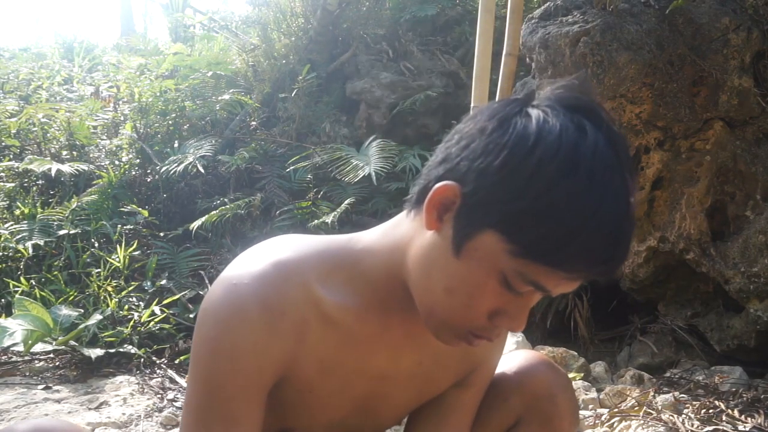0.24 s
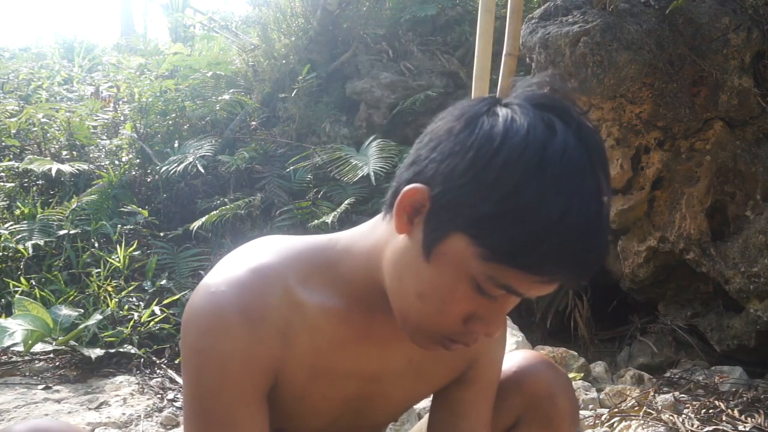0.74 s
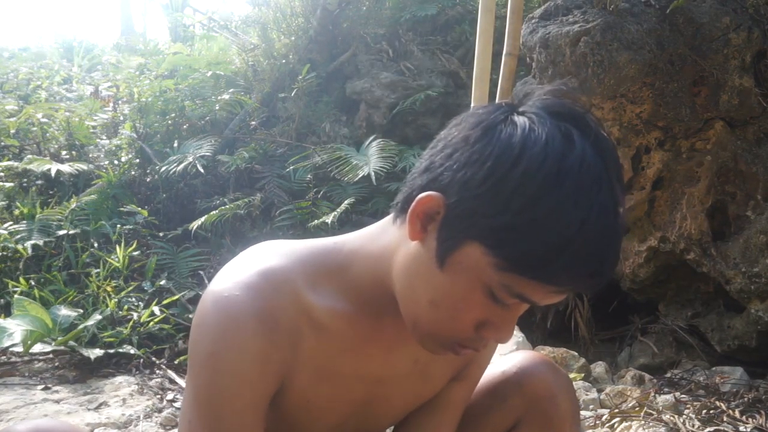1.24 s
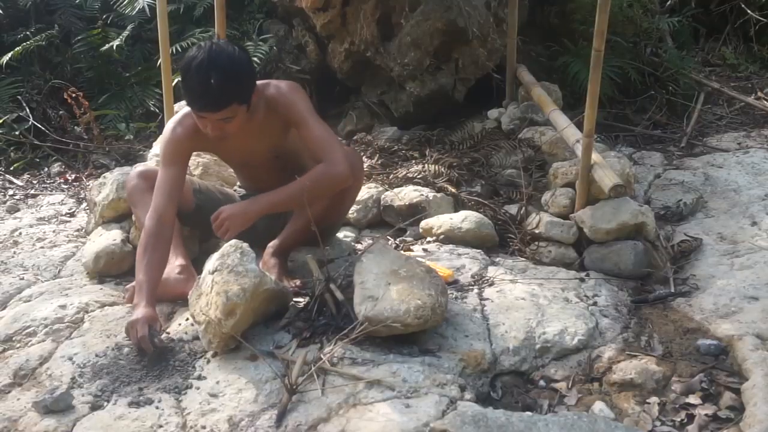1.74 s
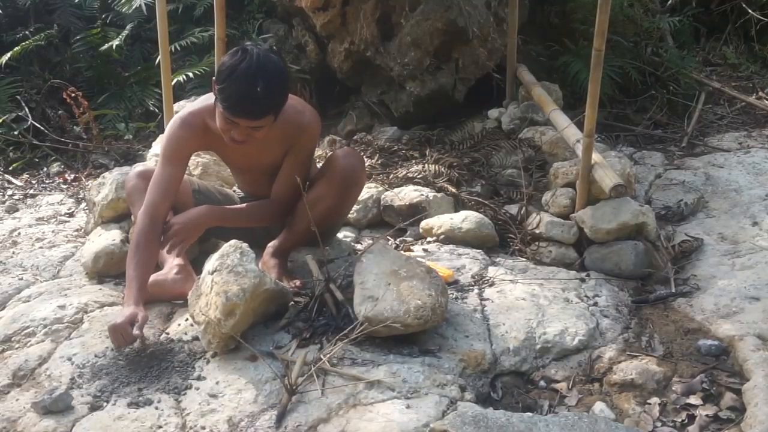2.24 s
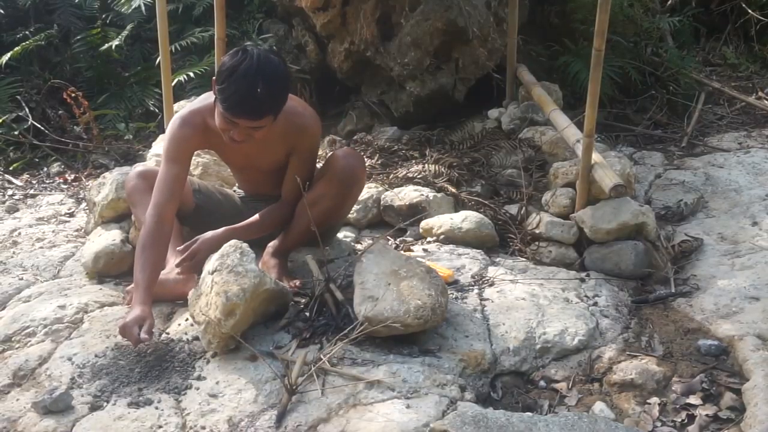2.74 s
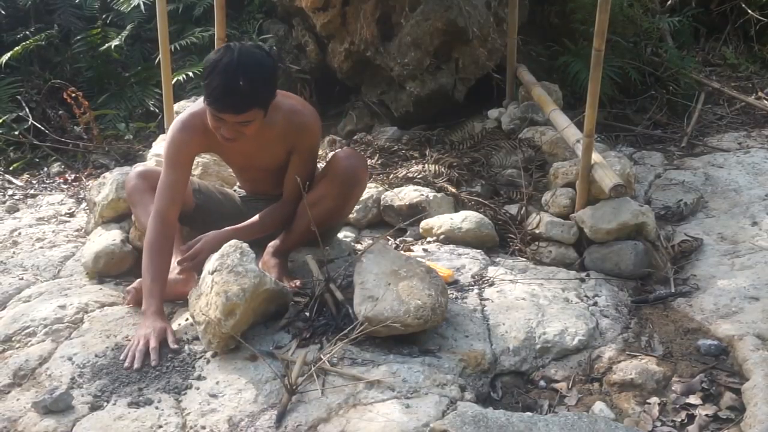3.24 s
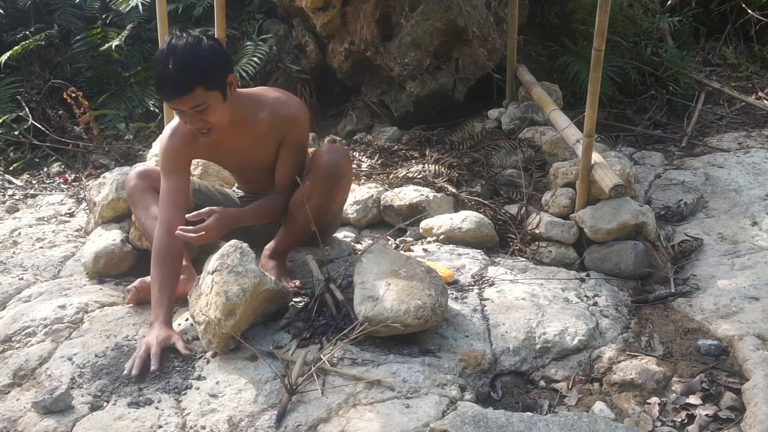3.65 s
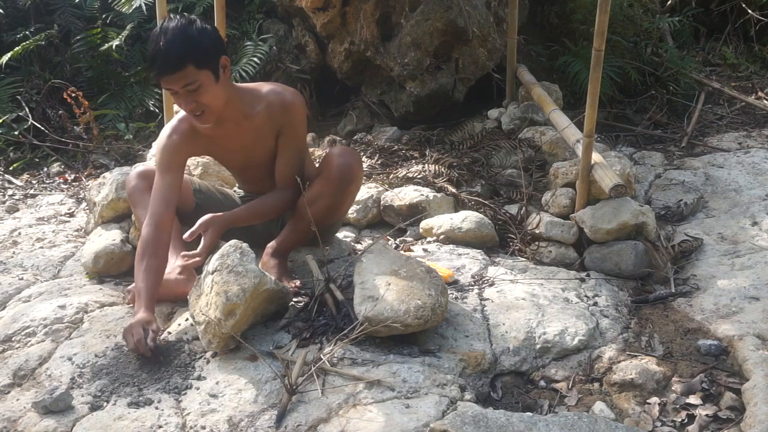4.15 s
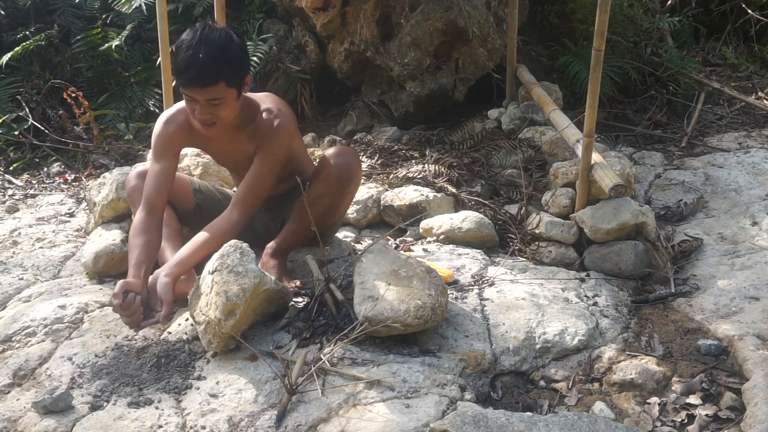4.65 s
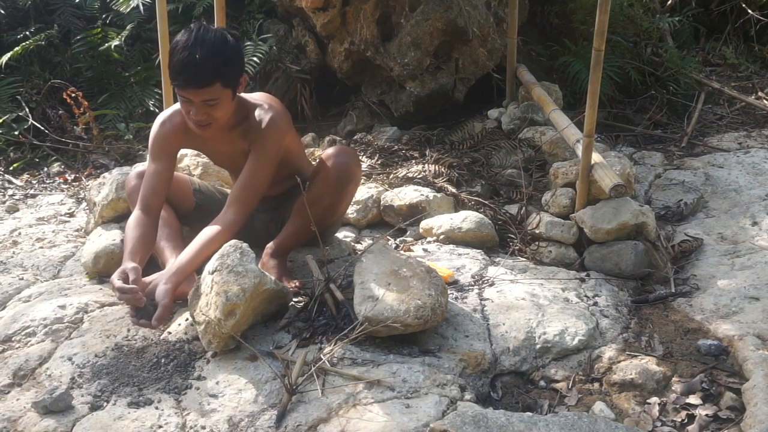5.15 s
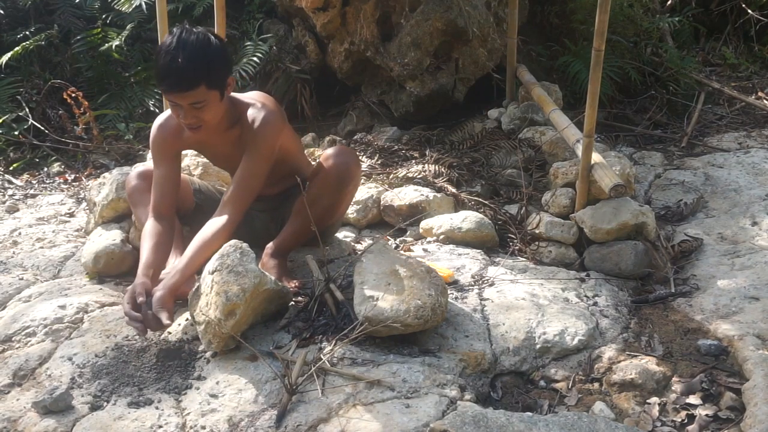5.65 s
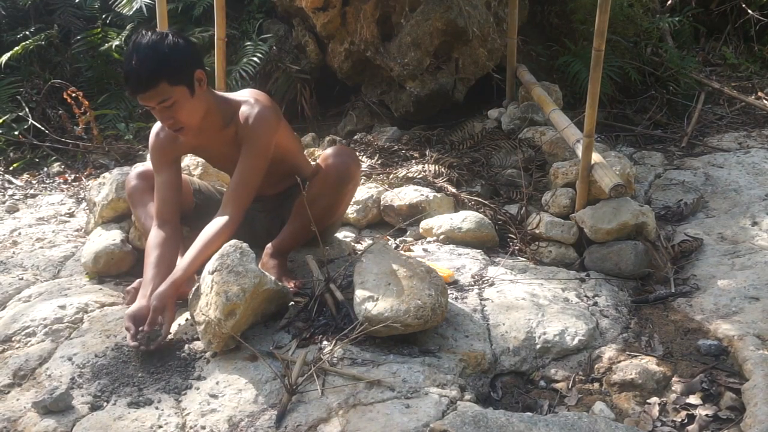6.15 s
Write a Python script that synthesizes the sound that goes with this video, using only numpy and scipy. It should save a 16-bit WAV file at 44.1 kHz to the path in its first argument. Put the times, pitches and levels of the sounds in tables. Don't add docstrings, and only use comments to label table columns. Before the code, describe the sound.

Outdoors among boulders, a stone strikes a rock slab about three times a second, each hit a dry clack with a low thud, crunching grit and tight reflections. High cicadas swell and stop over fast cricket chirps and soft stream and leaf rush. Before four seconds the blows end; a calmer moment follows with drips, tiny pebble ticks, thinner insects and a barely audible distant engine hum.

```python
import sys
import numpy as np
from scipy import signal
from scipy.fft import rfft, irfft, next_fast_len
from scipy.io import wavfile
from scipy.ndimage import uniform_filter1d, map_coordinates

SR = 44100
rng = np.random.default_rng(int(sys.argv[2]) if len(sys.argv) > 2 else 0)


def gain_from_db(level_db):
    decades = np.asarray(level_db, float) / 20
    return 10 ** decades


def wav_record(signal):
    frames = np.transpose(np.atleast_2d(signal))
    bounded = np.clip(frames, -1, 1)
    quanta = np.round(bounded * 32767).astype(np.int16)
    wavfile.write(sys.argv[1], SR, quanta)


N = 282664

CUT = 3.885
HISS_PER_GAIN = 0.31


def unit(x):
    return x / np.sqrt(np.mean(x ** 2) + 1e-20)


def along(points, hz):
    f, v = np.transpose(points)
    return np.interp(np.log(hz + 1), np.log(f + 1), v)


def curves(rows):
    s, *cols = np.transpose(rows)
    return [np.interp(np.arange(N) / SR, s, c) for c in cols]


def wobble(rate):
    knots = rng.standard_normal(int(N * rate / SR) + 4)
    return map_coordinates(knots, [np.arange(N) * rate / SR])


def filtered(x, response):
    m = next_fast_len(x.shape[-1] + 8192)
    spectrum = rfft(x, m) * response(np.fft.rfftfreq(m, 1 / SR))
    return irfft(spectrum, m)[..., :x.shape[-1]]


def resonance(hz, width_hz):
    return lambda f: (f * width_hz / (hz * hz - f * f + 1j * f * width_hz)) ** 2


def ring(t, hz, t60, attack):
    return gain_from_db(-60 * t / t60) * (1 - np.exp(-t / attack)) * np.sin(2 * np.pi * hz * t)


def add(track, s, sound):
    part = track[:, max(round(s * SR), 0):][:, :sound.shape[1]]
    part += sound[:, :part.shape[1]]


def hollow(x):
    # (f/Hz, t60/s)
    decay = [(200, .12), (500, 0.16), (1500, 0.04), (4000, 0.24), (10000, 0.029)]
    hz, t, z = signal.stft(rng.standard_normal((2, SR // 4)), SR, nperseg=256)
    fading = z * gain_from_db(-60 * t / along(decay, hz)[:, None])
    tail = signal.istft(fading, SR, nperseg=256)[1]
    return signal.fftconvolve(x, tail / np.linalg.norm(tail[0]), axes=1)[:, :x.shape[1]]


def camera_gain_db():
    # (t/s, gain/dB)
    gain = [(0, -0.5), (.907, -0.5), (.918, -13.5), (1.2, -10), (1.45, -6.5), (1.9, -4.5), (2.9, -4),
            (3.2, -1.5), (3.86, -4.5), (3.9, -1), (4.1, 1.5), (6.41, 1.5)]
    return curves(gain)[0]


def woods():
    # (f/Hz, density/dB per Hz)
    colour = [(24, -48.5), (40, -40), (75, -23), (146, -10), (228, -4.5), (556, 3.5), (1300, 3),
              (2200, -0.5), (4950, -7.5), (6200, -9), (8000, -10), (11000, -13.5), (14000, -20)]
    # (f/Hz, likeness from -1 to 1)
    alike = [(60, 0.62), (130, 0.68), (270, 0.032), (580, -0.33), (1230, -0.39), (2610, -0.02),
             (5560, 0.19), (11800, 0.51)]
    z = signal.stft(rng.standard_normal((2, N)), nperseg=512)[2]
    patches = uniform_filter1d(rng.standard_normal(z.shape[1:]), size=5, axis=0)
    patches = uniform_filter1d(patches, size=10, axis=1)
    depth_db = along([(300, 1.3), (2000, 2), (6000, 1.1)], np.fft.rfftfreq(512, 1 / SR))[:, None]
    pair = signal.istft(z * gain_from_db(depth_db * unit(patches)), nperseg=512)[1][:, :N]

    def mid_side(hz):
        angle = np.arccos(np.clip(along(alike, hz), -1, 1)) / 2
        return gain_from_db(along(colour, hz)) * [np.cos(angle), np.sin(angle)]

    mid, side = filtered(pair, mid_side)
    rush = unit(np.array([mid + side, mid - side]))
    hiss = filtered(rush, lambda hz: 1 / (1 + (3000 / (hz + 1)) ** 4))
    dulling = gain_from_db(HISS_PER_GAIN * camera_gain_db()) - 1
    return gain_from_db(-54.5 + 0.35 * wobble(2.8)) * (rush + dulling * hiss)


def trickle(count=420):
    t = np.arange(SR // 25) / SR
    when, pitch, size, side = rng.uniform(size=(count, 4)).T
    hz = 700 * np.exp(1.5 * pitch)[:, None]
    level_db = -67 - 2.5 * np.log(size + .03)
    bubbles = gain_from_db(level_db)[:, None] * ring(t, hz * (1 + 3 * t), t60=60 / hz, attack=.002)
    out = np.zeros((2, N))
    for s, pan, bubble in zip(when * N / SR, side * np.pi, bubbles):
        add(out, s, np.outer([np.sin(pan + .5), np.cos(pan + .5)], bubble))
    return out


def buzz(hz, width_hz, rate, depth):
    clicks = np.diff(np.floor(np.cumsum(rate * (1 + .008 * wobble(4))) / SR), prepend=0)
    t = np.arange(SR // 20) / SR
    leaves = rng.standard_normal((2, len(t))) * gain_from_db(-60 * t / 0.045)
    near = unit(signal.fftconvolve(clicks[None], leaves, axes=1)[:, :N])
    far = rng.standard_normal((2, N))
    return unit(filtered(depth * near + (1 - depth) * far, resonance(hz, width_hz)))


def phrases(rows):
    t = np.arange(N) / SR
    stop_s, resting_db, swell = 0.068, -75, 1.6
    gain = gain_from_db(resting_db)
    for start, full, stop, db in rows:
        gain = gain + gain_from_db(db) * np.interp(t, [start, full, stop, stop + stop_s], [0, 1, 1, 0]) ** swell
    return gain


def cicadas():
    # (start t/s, full voice t/s, stop t/s, level/dB)
    near_phrases = [(-.2, .8, 1, -56), (1, 1.22, 1.335, -55.5), (1.7, 2.55, 2.88, -55.5),
                    (2.85, 3.75, 3.86, -57), (3.7, 3.9, 4.05, -62), (4, 4.6, 4.95, -69),
                    (4.8, 5.25, 5.76, -63), (5.6, 6.1, 5.6, -72)]
    middle_phrases = [(.2, .7, 0.75, -68.5), (2.7, 3.3, 3.5, -64.5), (4.2, 5.3, 5.76, -65),
                      (5.6, 6, 7.3, -80)]
    beside_phrases = [(-.2, .05, 0.094, -65), (2.5, 2.75, 3.12, -59)]
    deep_phrases = [(3.7, 3.95, 4.45, -71), (4.6, 5.4, 5.76, -72), (5.7, 6.2, 6.5, -63.5)]
    pair = buzz(8060, 260, rate=69, depth=.65) + .8 * buzz(8210, 320, rate=70, depth=.65)
    near = np.where(np.arange(N) < CUT * SR, unit(pair), buzz(8030, 300, rate=66, depth=.4))
    middle = gain_from_db(1.5 * wobble(5)) * buzz(7620, 400, rate=64, depth=.3)
    near = gain_from_db(1.2 * wobble(5.5)) * near
    beside = buzz(6950, 450, rate=62, depth=.3)
    deep = buzz(7330, 300, rate=79, depth=0.34)
    out = phrases(near_phrases) * near + phrases(middle_phrases) * middle
    return out + phrases(beside_phrases) * beside + phrases(deep_phrases) * deep


def pebbles():
    # (t/s, level/dB, f/Hz, t60/s)
    knocks = [(.038, -44, 1440, 0.084), (.291, -41, 550, 0.026), (0.339, -51, 990, 0.099),
              (.437, -42.5, 1390, 0.081), (0.538, -45, 1450, 0.066), (0.934, -51, 903, 0.095),
              (1.977, -47.5, 3980, 0.094), (2.269, -46, 1620, 0.19), (2.595, -41.5, 1420, 0.15),
              (3.234, -38, 1460, 0.015), (3.843, -48, 415, 0.059), (3.868, -46, 420, 0.034),
              (2.61, -37, 420, 0.033), (3.37, -52, 950, .1), (3.66, -54.5, 1170, .1), (4.872, -49, 70, .05),
              (4.48, -42, 10300, .01), (4.838, -37.5, 3900, 0.025), (4.96, -46.5, 2070, 0.071),
              (5.031, -56, 2200, 0.2), (5.089, -54.5, 2200, 0.6), (5.14, -53, 2310, 0.26),
              (4.871, -45, 9000, .008), (5.105, -44, 9500, 0.0093)]
    out, t = np.zeros((2, N)), np.arange(SR // 8) / SR
    for s, db, hz, t60 in knocks:
        noise = rng.standard_normal(len(t)) + 0.65 * rng.standard_normal((2, len(t)))
        knock = unit(filtered(noise, resonance(hz, .4 * hz)))
        add(out, s, gain_from_db(db - 5 - 60 * t / t60) * knock)
    return out * gain_from_db(-camera_gain_db())


def chirps():
    # (first chirp t/s, last t/s, period/s)
    trains = [
        (.073, 3.85, .07706),
        (3.953, 6.45, .072),
    ]
    # (t/s, level/dB)
    effort = [(0, -51.5), (.85, -55), (.95, -63), (1.4, -53), (1.7, -52), (2.15, -57), (2.5, -54),
              (3.1, -58), (3.45, -53.5), (4.1, -59), (4.45, -63), (4.7, -76), (4.97, -66), (5.25, -76),
              (5.55, -82), (5.83, -63), (6.05, -77), (6.35, -54.5)]
    scatter_s, scatter_db = .003, 1.5
    when = np.concatenate([np.arange(first, last, period) for first, last, period in trains])
    chance = rng.standard_normal((len(when), 2))
    level_db = np.interp(when, *np.transpose(effort)) + scatter_db * chance[:, 1]
    return zip(when + scatter_s * chance[:, 0], level_db)


def crickets():
    out, t = np.zeros((2, N)), np.arange(SR // 20) / SR
    for s, db in chirps():
        length = .04 * np.exp(rng.normal(0, .08))
        stroke = np.sin(np.pi * np.clip(t / length, 0, 1)) ** 2
        phase = 2 * np.pi * (6830 * t - 3400 * t ** 2) + rng.normal(0, .6, (2, 1))
        side_db = [[db - 1.5], [db - .3]] + rng.normal(0, 0.5, (2, 1))
        add(out, s - length / 2, gain_from_db(side_db) * stroke * np.sin(phase))
    far = gain_from_db(-66.5 + 2.5 * wobble(5)) * buzz(6695, 140, rate=47, depth=.1)
    return out + far * gain_from_db([[.9], [-.9]])


def crushed_grit(since):
    # (f/Hz, density/dB per Hz)
    colour = [(150, -31), (400, -0.5), (1000, -1.5), (2200, -3.5), (4500, -10.5), (7000, -12.5),
              (9000, -17), (11500, -17)]
    n = len(since)
    grains = rng.standard_normal((3, n)) * gain_from_db(7 * rng.standard_normal(n))
    grains = 0.53 * grains[0] + 0.91 * grains[1:]
    grains = unit(filtered(grains, lambda f: gain_from_db(along(colour, f))))
    decay = gain_from_db(-60 * since / 0.021) + gain_from_db(-35 - 60 * since / 0.43)
    return np.where(since < 0, gain_from_db(-8.5 + 5800 * since), decay) * grains


def reflect(near, direct, walls_db):
    # (delay/s, left level/dB, right level/dB)
    boulders = [(.0009, -10, -18), (.0017, -24.5, -11), (.0031, -16.5, -10.5), (.0046, -9, -9),
                (.0068, -18.5, -17)]
    for delay, *side_db in boulders:
        for side in (0, 1):
            lag = round(SR * delay * np.exp(rng.normal(0, 0.13)))
            near[side, lag:] += gain_from_db(side_db[side] + walls_db) * direct[side, :-lag]


def stone():
    # (t/s, peak level/dB, thud f/Hz, click level/dB)
    blows = [(0.2593, -16.5, 2420, 6), (0.2614, -4.5, 844, -14.5), (0.5824, -21, 2320, 5),
             (0.5877, -8, 900, -16), (0.9047, 0.5, 1130, -13), (0.906, 0, 3200, -6.5),
             (1.2925, -17, 2330, 1.5), (1.2948, -25.5, 770, -16), (1.6003, -30, 960, -15),
             (1.6027, -10, 790, -6), (1.9249, -6.5, 1124, -8.5), (1.9285, -20, 1480, 11.5),
             (2.2423, -2, 1270, -4), (2.2462, -8, 820, -8), (2.5712, 1, 1370, -16),
             (2.5702, -4.5, 3740, -41), (2.8921, -3, 1374, -15), (3.1974, -6.5, 1600, -4),
             (3.1986, -13.5, 850, 3), (3.202, -42, 2350, -25), (3.5103, -3, 900, -5.5),
             (3.526, -20.5, 1490, -34), (3.8296, -11, 1210, -2.5), (3.831, 2, 877, -19)]
    # (first touch t/s, grit level/dB, low body level/dB, body f/Hz, high tone level/dB)
    strokes = [(.2587, -25.5, -21, 486, -29.5), (.5822, -25, -36, 294, -27),
               (.9049, -26.5, -25, 230, -20.5), (1.2927, -24, -20, 228, -26.5),
               (1.6008, -22, -12.5, 318, -36.5), (1.9246, -14, -18.5, 233, -29),
               (2.2425, -18.5, -17, 420, -38), (2.5702, -20.5, -16, 387, -26),
               (2.8924, -14.5, -17, 271, -28), (3.1974, -21, -21.5, 278, -32),
               (3.5104, -23.5, -15.5, 340, -26.5), (3.8298, -16, -6, 434, -14.5)]
    spent_db_per_s = 1507
    close_until = 1.1
    out, t = np.zeros((2, N)), np.arange(SR // 4) / SR
    lead = SR // 200
    for s, db, hz, click_db in blows:
        first, grit_db, body_db, body_hz, chime_db = min(strokes, key=lambda stroke: abs(stroke[0] - s))
        spent_db = spent_db_per_s * max(s - first, 0)
        close = s < close_until
        pan_db, walls_db = (2.5, -4) if close else (-.4, .1)
        body_hz = body_hz * np.exp(rng.normal(0, 0.057))
        thud = ring(t, hz, t60=5 / hz, attack=0.00034)
        thud += gain_from_db(body_db - db - spent_db) * ring(t, body_hz, t60=0.012, attack=0.00059)
        click_hz = 2200 * np.exp(rng.normal(0, 0.066))
        click = -gain_from_db(click_db) * ring(t, click_hz, t60=0.0039, attack=0.00014)
        chime_hz = 6730 if close else 8130
        chime = gain_from_db(chime_db - spent_db) * ring(t, chime_hz, t60=0.0082, attack=0.0003)
        direct = (gain_from_db(db + 4) * (thud + click) + chime) * gain_from_db([[pan_db / 2], [-pan_db / 2]])
        direct = np.pad(direct, ((0, 0), (lead, 0)))[:, :len(t)]
        near = direct + gain_from_db(grit_db - spent_db) * crushed_grit(t - lead / SR)
        reflect(near, direct, walls_db)
        add(out, s - lead / SR, near + gain_from_db(-21.5) * hollow(near))
    return filtered(out, lambda f: (1j * f / (1j * f + 170)) ** 4)


def drips():
    # (t/s, peak level/dB, f/Hz, t60/s)
    drops = [(0.3697, -49.5, 3180, 0.04), (2.7013, -44.5, 1800, 0.032), (4.0504, -43, 1620, 0.035),
             (4.8693, -39, 2840, 0.024), (4.8846, -41, 2690, 0.023), (5.1694, -48, 1440, 0.068),
             (5.5248, -45.5, 1440, 0.062), (5.637, -46, 1030, 0.035), (5.651, -43, 1147, 0.042),
             (4.007, -48, 1970, 0.037), (4.082, -47.5, 2150, 0.038), (4.215, -49, 2380, 0.033),
             (5.7204, -37, 1173, 0.033)]
    out, t = np.zeros((2, N)), np.arange(SR // 8) / SR
    for s, db, hz, t60 in drops:
        bubble = ring(t, hz * (.96 + 4 * t), t60, attack=0.0031)
        burst = gain_from_db([[db + 4.5], [db - .6]]) * bubble
        add(out, s, burst + gain_from_db(-3) * hollow(burst))
    return out * gain_from_db(-camera_gain_db())


def engine():
    # (t/s, f/Hz, level/dB)
    hum = [(3.88, 154.7, -100), (3.92, 152.9, -79.5), (4.45, 151.3, -73), (5, 159.7, -84), (5.4, 160, -82),
           (5.7, 161.7, -84), (6, 161, -77.5), (6.41, 161.6, -85)]
    hz, db = curves(hum)
    upper_gain = gain_from_db(db + 3 + 1.5 * wobble(5))
    upper = upper_gain * np.sin(2 * np.pi * np.cumsum(hz + .7 * wobble(8)) / SR)
    lower_gain = gain_from_db(-86 + 3 + 2.5 * wobble(6)) * (np.arange(N) > CUT * SR)
    lower = lower_gain * np.sin(2 * np.pi * np.cumsum(133 + 1.2 * wobble(8)) / SR)
    return upper + lower


def scene():
    ground = stone() + drips() + pebbles()
    insects = gain_from_db(HISS_PER_GAIN * camera_gain_db()) * (crickets() + cicadas())
    return ground + insects + woods() + trickle() + engine()


def top_cut(x):
    return signal.sosfilt(signal.butter(12, 12430, fs=SR, output="sos"), x)


def record(dry):
    top_hz = 11060
    level = dry * gain_from_db(camera_gain_db())
    level = level / (1 + np.abs(level / .99) ** 8) ** (1 / 8)
    passed = lambda hz: np.where(hz < top_hz, 1, gain_from_db(-36 - .008 * (hz - top_hz)))
    return top_cut(filtered(level, passed))


dry = scene()
out = record(dry)
wav_record(out)
```